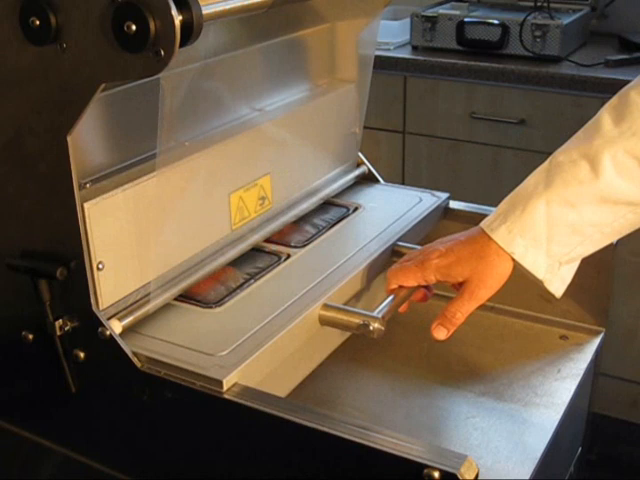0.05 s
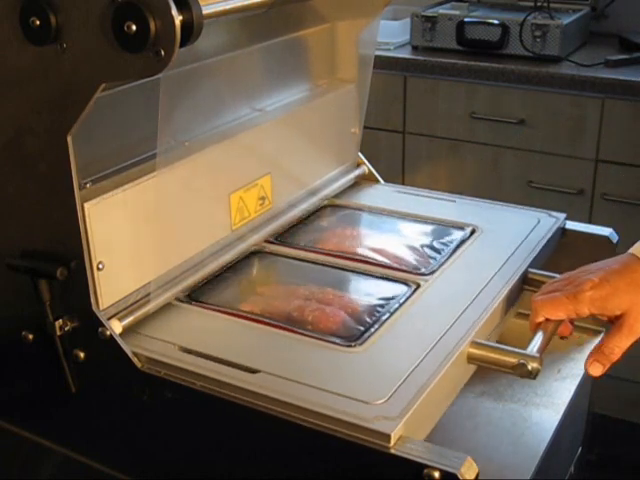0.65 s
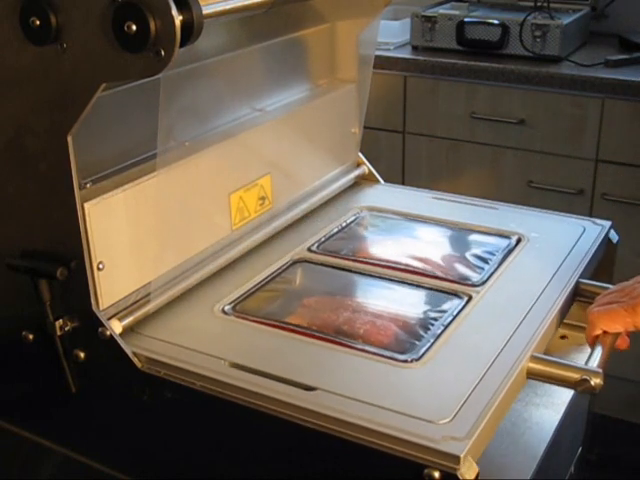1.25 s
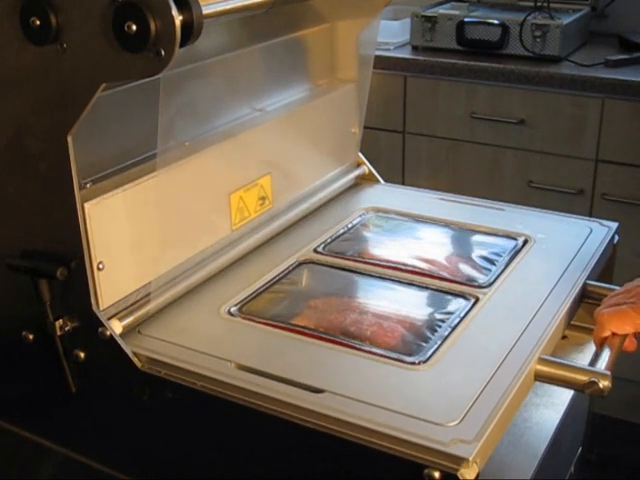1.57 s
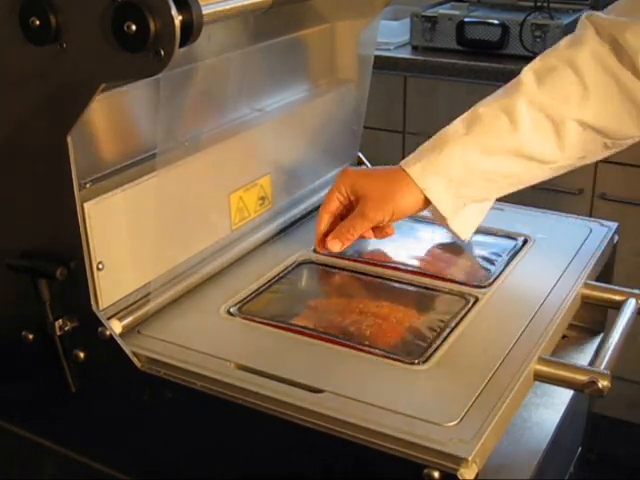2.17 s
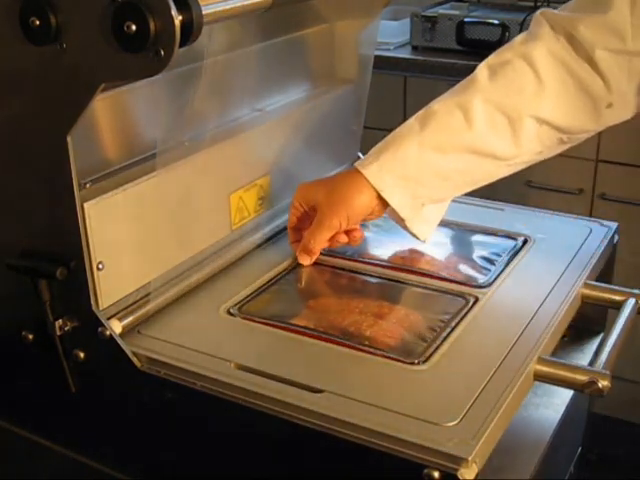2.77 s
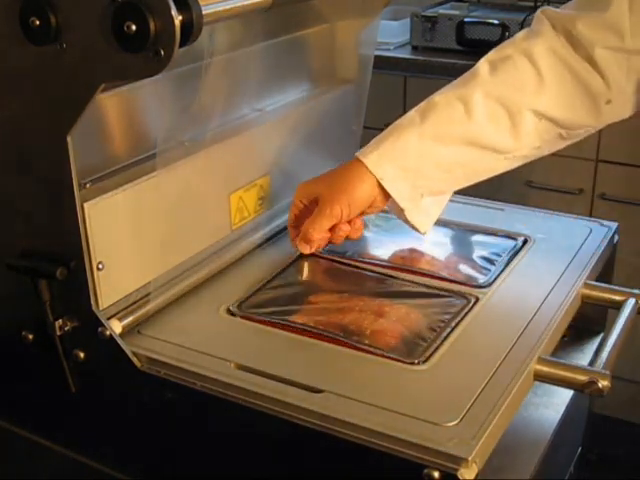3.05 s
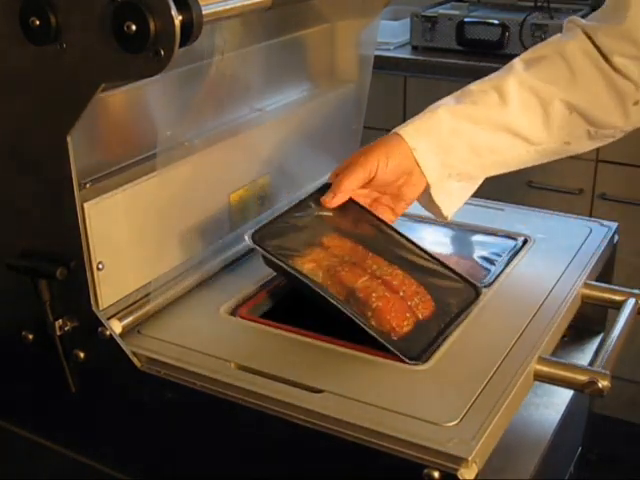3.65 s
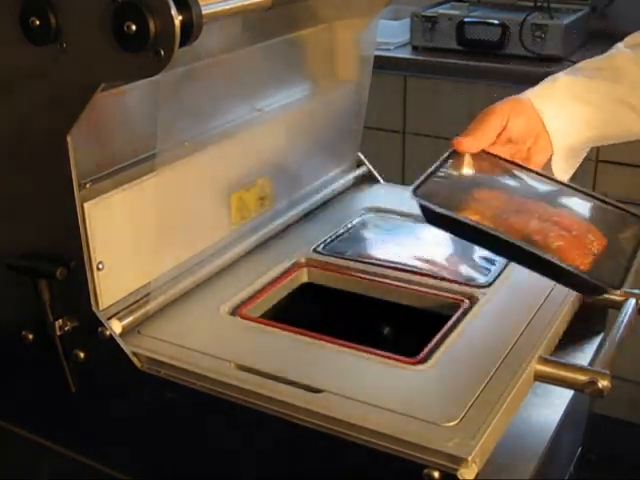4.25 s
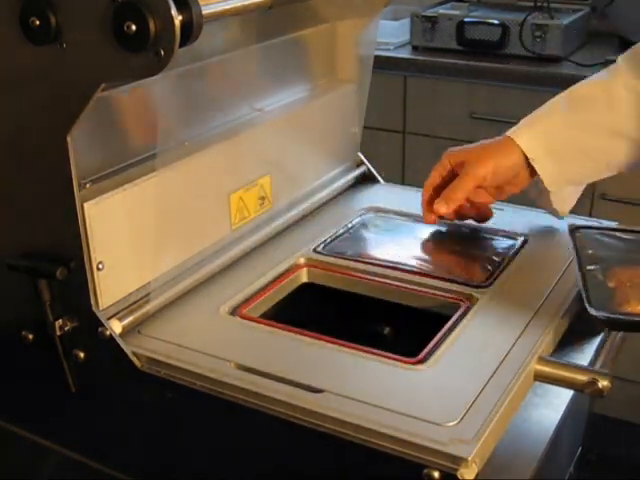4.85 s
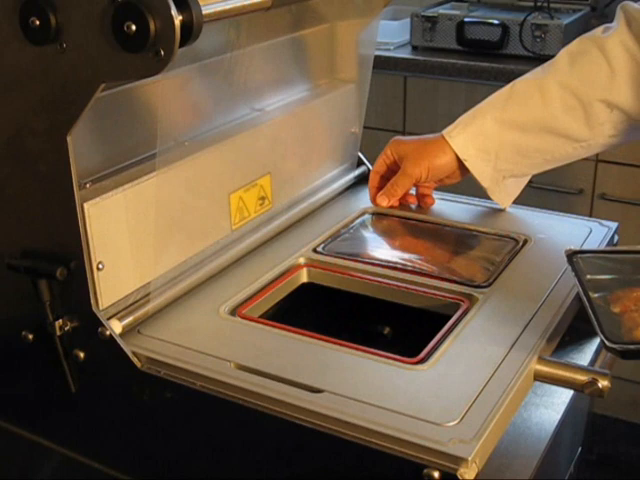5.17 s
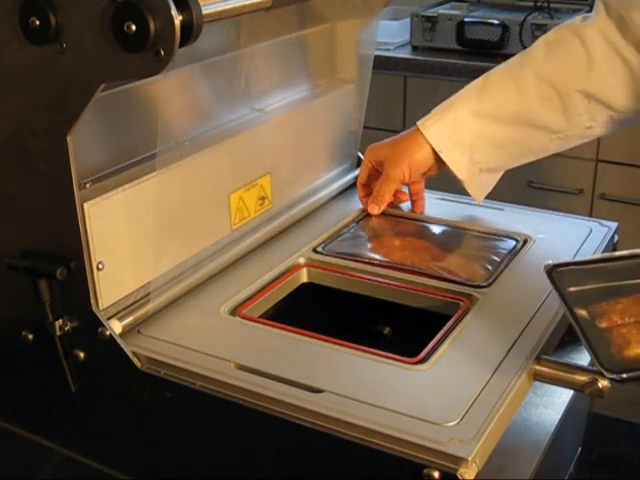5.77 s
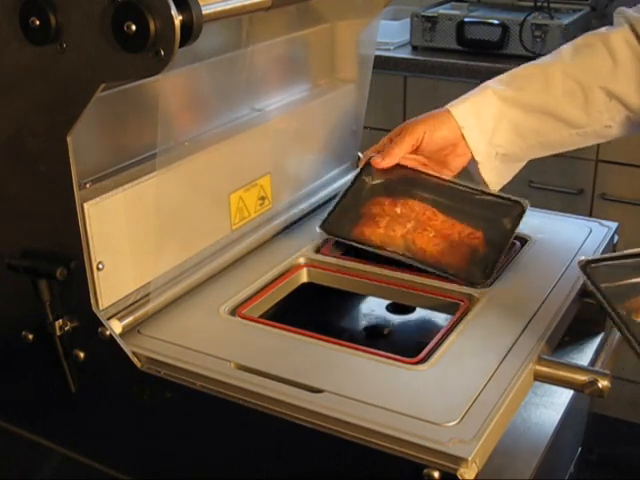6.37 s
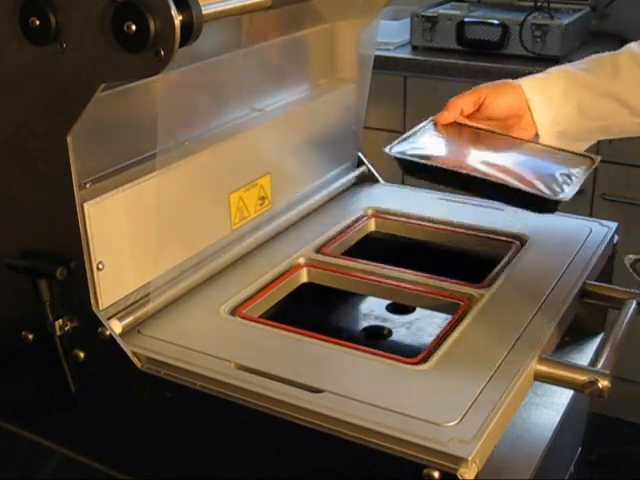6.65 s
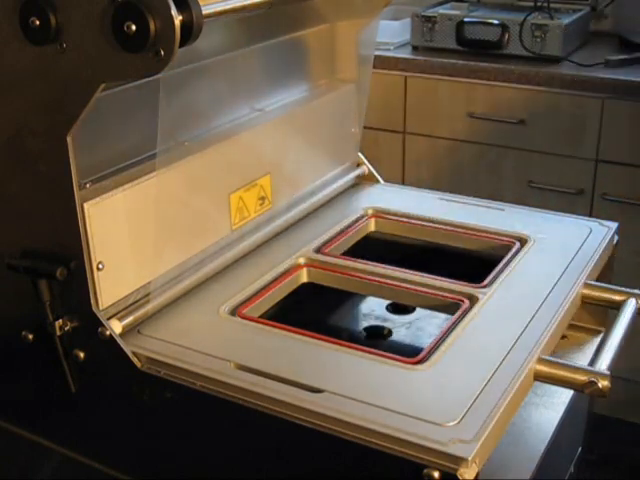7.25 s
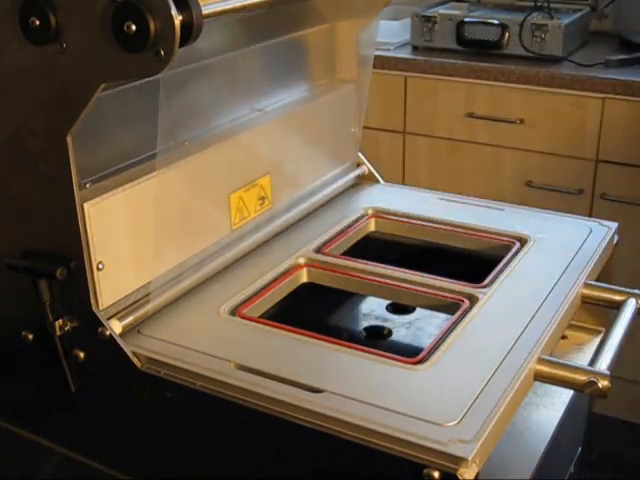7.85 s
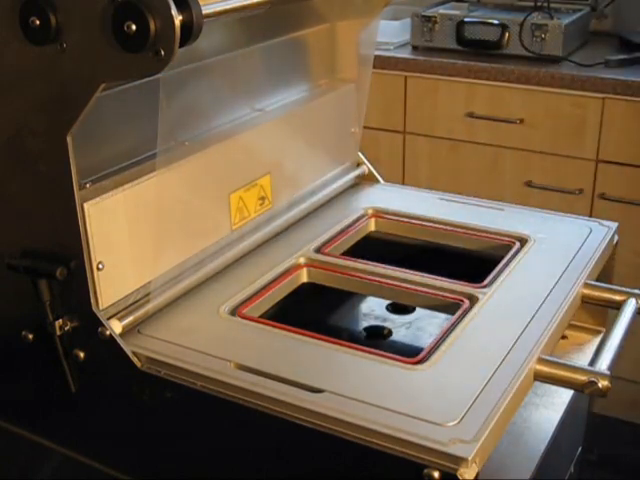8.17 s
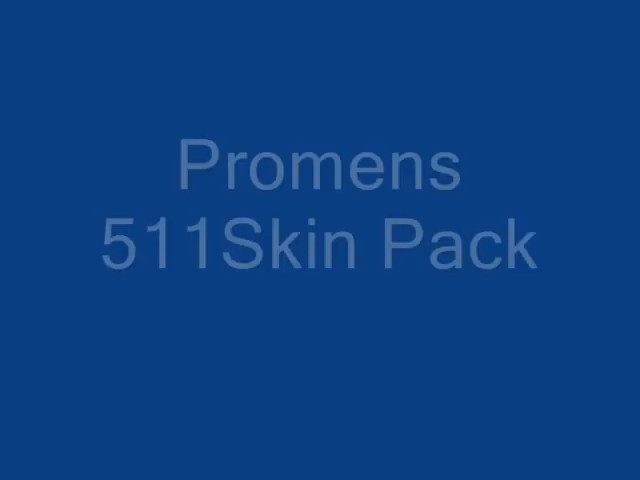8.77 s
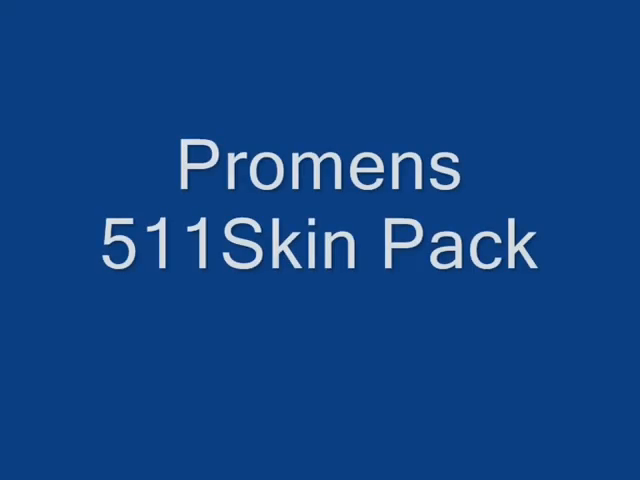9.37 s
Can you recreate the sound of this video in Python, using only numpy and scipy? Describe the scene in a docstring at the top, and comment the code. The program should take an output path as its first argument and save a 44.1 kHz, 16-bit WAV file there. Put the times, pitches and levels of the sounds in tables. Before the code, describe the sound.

From the start, the vacuum pump of a tabletop packaging machine runs steadily, heard close in a small hard-walled workroom. It makes a buzzing, slightly wavering hum over a rush of exhaust air that resonates in the steel housing. Very fast, light ticking runs through it, with a faint fan tone and thin motor whines beneath. A soft, grainy high hiss sputters up and settles at uneven intervals throughout.

At about 1.5 seconds a steel drawer hits its end stop: one loud metallic clunk with a quick rattling rebound and a short ring in the room. The machine noise ducks briefly and is back by about 2 seconds. The pump keeps the same pace, its tones swelling and sinking a little around 7 to 8.5 seconds. At about 8.6 seconds the sound cuts off abruptly, leaving silence.

```python
"""The vacuum pump of a tabletop skin-pack machine runs steadily in a small hard-walled workroom.
Three vanes a turn interrupt the flow, giving a buzzing harmonic hum, ticks, and puffs of exhaust that
excite the steel housing's resonances. A fan tone, motor whines and flares of sputtering hiss lie beneath.
A drawer is pulled out and knocks on its end stop; an automatic gain control ducks and recovers.
At the end the sound cuts off."""
import sys
import numpy as np
from scipy import signal
from scipy.fft import rfft, irfft, next_fast_len
from scipy.io import wavfile
from scipy.ndimage import uniform_filter1d, minimum_filter1d

SR = 44100
rng = np.random.default_rng(int(sys.argv[2]) if len(sys.argv) > 2 else 0)


def to_wav(s):
    """Save 16-bit WAV."""
    ch = np.atleast_2d(s).T  # columns
    pcm = np.round(np.clip(ch, -1, 1) * 32767)  # PCM
    wavfile.write(sys.argv[1], SR, pcm.astype(np.int16))


N = 419813
TIME = np.arange(N) / SR
SHAFT_HZ = 24.118


def from_db(db):
    """The decibel scale: 20 dB is a factor of ten in amplitude."""
    return 10 ** (np.asarray(db) / 20)


def unit_rms(x):
    """Normalisation to unit mean power."""
    return x / np.sqrt(np.mean(x ** 2) + 1e-20)


def curve(rows):
    """Linear interpolation of (time_s, value) rows at every sample."""
    return np.interp(TIME, *np.transpose(rows))


def drift(corner_hz):
    """Slow random fluctuation: low-passed noise of unit rms."""
    step, warm_up = 100, 1000
    pole = np.exp(-2 * np.pi * corner_hz * step / SR)
    noise = rng.standard_normal(N // step + warm_up + 2)
    slow = signal.lfilter([1], [1, -2 * pole, pole * pole], noise)[warm_up:]
    return np.interp(np.arange(N) / step, np.arange(len(slow)), unit_rms(slow))


def coloured(x, spectrum, resonances=()):
    """Source-filter model: a broad spectral envelope with resonant peaks shapes x, at unit rms."""
    size = next_fast_len(N)
    freqs = np.maximum(np.arange(size // 2 + 1) * SR / size, 1)
    hz, db = np.transpose(spectrum)
    envelope = from_db(np.interp(np.log(freqs), np.log(hz), db))
    peaks = sum(from_db(peak_db) ** 2 / (1 + (2 * (freqs - centre_hz) / width_hz) ** 2) ** 2
                for centre_hz, width_hz, peak_db in resonances)
    return unit_rms(irfft(rfft(x, size) * envelope * np.sqrt(1 + peaks), size)[:N])


def ring(clicks, hz, t60_s):
    """Damped oscillator: a unit impulse starts a decaying sine of unit amplitude."""
    pole, angle = from_db(-60 / (t60_s * SR)), 2 * np.pi * hz / SR
    return signal.lfilter([0, np.sin(angle)], [1, -2 * pole * np.cos(angle), pole * pole], clicks + 1e-18)


def fading(clicks, t60_s):
    """Exponential decay: an envelope that jumps at each impulse and dies away."""
    return signal.lfilter([1], [1, -from_db(-60 / (t60_s * SR))], clicks + 1e-18)


def low_pass(x, hz):
    """First-order roll-off of the treble."""
    return signal.sosfilt(signal.butter(1, hz, fs=SR, output="sos"), x + 1e-18)


def reflections(x, t60_s, wet_db, above_hz):
    """Diffuse reverberation: dense reflections add a decaying, high-passed tail."""
    t = TIME[:SR // 2]
    tail = rng.standard_normal(len(t)) * from_db(-60 * t / t60_s)
    high_pass = signal.butter(2, above_hz, "high", fs=SR, output="sos")
    tail = signal.sosfilt(high_pass, tail / np.linalg.norm(tail))
    return x + from_db(wet_db) * signal.fftconvolve(x, tail)[:N]


def shaft_turns(wander=.0007, flutter=.0009):
    """Phase is the integral of speed: the turns made by a nearly steady motor."""
    return np.cumsum(SHAFT_HZ * (1 + wander * drift(.7) + flutter * drift(12))) / SR


# blade tone of a second rotor, probably the cooling fan: time_s, pitch_hz
FAN_PITCH = [(0, 294.6), (2, 294.8), (3.6, 293), (5.2, 292.7), (7.2, 294.4), (8.6, 293.9)]

def fan(level_db):
    """Beating: a blade tone a few hertz above the shaft's twelfth harmonic throbs against it."""
    cycles = np.cumsum(curve(FAN_PITCH)) / SR + rng.random()
    return np.sqrt(2) * from_db(level_db) * np.sin(2 * np.pi * cycles)


# thin tones of the motor: pitch_hz, level_db
WHINES = [(825.6, -38.5), (1718.0, -40), (2531, -50), (2892, -56.5), (4173, -49.5)]

def motor_whines(turns, waver_db):
    """Inharmonic partials: tones that follow the motor's speed but lie between the pump's harmonics."""
    out = 0
    for hz, db in WHINES:
        cycles = hz * turns / SHAFT_HZ + rng.random()
        out += from_db(db + waver_db * drift(8)) * np.sin(2 * np.pi * cycles)
    return np.sqrt(2) * out


# strong flares of sputtering at the exhaust: start_s, level_db
FLARES = [(0.24, -39), (0.576, -37), (1.24, -40), (1.362, -38), (2.096, -46), (2.608, -40), (3.057, -41.5),
          (3.769, -37.5), (4.387, -40), (5.0, -43), (5.497, -41), (5.837, -41.4), (6.452, -39),
          (6.703, -41), (7.331, -41), (7.917, -41.5)]

def flare_starts(weak_per_s=4.5, weak_db=-45.5, spread_db=3):
    """A point process: weak impulses at loosely even intervals among the timed strong ones."""
    count = np.cumsum(weak_per_s * np.exp(.5 * drift(4))) / SR
    size_db = weak_db + spread_db * np.clip(rng.standard_normal(N), -2, 2)
    starts = np.diff(np.floor(count), prepend=0) * from_db(size_db)
    for start_s, db in FLARES:
        starts[round(start_s * SR)] = from_db(db)
    return starts


# spectrum of the hiss: frequency_hz, relative_db
SPUTTER_SPECTRUM = [(1200, -33.5), (3000, -0.5), (5000, 5), (9200, 0.5), (10000, -4.5), (12000, -6.5),
                    (15500, -27)]
# resonances of the exhaust outlet: centre_hz, width_hz, peak_db
OUTLET_MODES = [(7000, 120, 0.5), (7780, 180, 3.5), (11460, 150, 4)]

def sputter(turns):
    """Amplitude-modulated noise: a grainy hiss throbs with the shaft, flares up and settles."""
    flares = low_pass(fading(flare_starts(), t60_s=.36), hz=45)
    steady = from_db(-45.5 + 2 * drift(8.1))
    grains = rng.standard_normal(N) * from_db(2.2 * np.clip(rng.standard_normal(N), -3, 3))
    spray = grains * from_db(1.8 * np.cos(2 * np.pi * turns))
    spray = reflections(spray, t60_s=.13, wet_db=0, above_hz=5800)
    return np.hypot(flares, steady) * coloured(spray, SPUTTER_SPECTRUM, OUTLET_MODES)


# spectrum of the vane ticks: frequency_hz, relative_db
TICK_SPECTRUM = [(300, -29), (900, -3), (1500, -9.5), (2000, 3), (3000, 4), (4200, -5), (4500, -3.5),
                 (9000, -17.5), (15500, -35.5)]
# resonance of the pump casting: centre_hz, width_hz, peak_db
CASTING_MODES = [(4280, 160, 2.5)]

def vane_ticks(turns, spread_db=2, throb_db=2):
    """Impact and dispersion: vanes slap the chamber wall unevenly and the casting smears each click."""
    ticks = np.diff(np.floor(3 * turns), prepend=0)
    ticks *= from_db(spread_db * rng.standard_normal(N) + throb_db * np.cos(2 * np.pi * turns))
    t = TIME[:SR // 20]
    path = rfft(rng.standard_normal(len(t)) * np.exp(-t / .012))
    all_pass = irfft(path / np.abs(path))
    return coloured(signal.fftconvolve(ticks, all_pass)[:N], TICK_SPECTRUM, CASTING_MODES)


# the drawer meets its stop and rebounds: start_s, relative_db, brightness_hz
KNOCKS = [(1.505, -13, 7000), (1.5076, 2, 7020), (1.5115, -3.5, 7000), (1.5135, -1, 1200), (1.53, -8, 2000),
          (1.551, -2, 1500)]
# modes of the steel tray: pitch_hz, relative_db, t60_s
TRAY_MODES = [(86, -24, .3), (165, -11, 0.28), (410, -21.5, .1), (486, -9.5, 0.068), (660, -6.5, .08),
              (905, -7, .07), (1070, -11, .1), (1308, -17, 0.077), (1680, -11.5, 0.052), (1934, -18, 0.05),
              (2430, -7, 0.07), (2683, -8, 0.039), (3770, -18, .03)]
# spectrum of the rails' clatter: frequency_hz, relative_db
RAIL_SPECTRUM = [(50, -20.5), (150, 6), (600, 8.5), (1400, 1.5), (2700, -2.5), (4000, -7.5), (8000, -18),
                 (15000, -37.5)]

def drawer():
    """Impact excitation: blows on the end stop ring the tray's modes and rattle the rails in the room."""
    pushes, clatter = np.zeros(N), np.zeros(N)
    rattle = coloured(rng.standard_normal(N), RAIL_SPECTRUM)
    for start_s, db, bright_hz in KNOCKS:
        start = round(start_s * SR)
        span = slice(start, start + SR // 4)
        click = from_db(db) * signal.unit_impulse(SR // 4)
        # a softer contact dulls both the ring and the clatter
        pushes[span] += low_pass(click, bright_hz)
        clatter[span] += low_pass(fading(click, t60_s=.029) * rattle[span], 2 * bright_hz)
    tray = sum((-1) ** k * from_db(db) * ring(pushes, hz, t60_s)
               for k, (hz, db, t60_s) in enumerate(TRAY_MODES))
    knock = from_db(-7.5) * tray + from_db(-6.5) * clatter
    return reflections(knock, t60_s=.45, wet_db=-2, above_hz=57)


# spectrum of the exhaust rush: frequency_hz, relative_db
EXHAUST_SPECTRUM = [(25, -11), (60, -9.5), (130, -2), (350, 1.5), (850, 1.5), (1400, -2.5), (2000, -5),
                    (2900, -7.5), (4150, -8.5), (4450, -17), (9200, -28), (9900, -32.5), (12500, -37.5),
                    (15500, -42)]
# resonances of the steel housing: centre_hz, width_hz, peak_db
HOUSING_MODES = [(27, 2.2, 13), (275.4, 14, 8.5), (426.5, 38, 5.5), (460, 8.2, 7), (477.3, 10.9, 9),
                 (556.5, 18, 8), (579, 27, 6.5), (684, 13, 6.5), (756, 6.7, 10), (844, 23, -4.5),
                 (875, 4.8, 13), (1042, 13, 6.5), (1169, 20, 7.5), (1204, 54, 8.5), (1244, 22, 11),
                 (1327, 17.0, 9), (1404.5, 20, 12), (1588, 35, 5.5), (2969, 32, 3.5), (4247, 99, 4),
                 (11600, 132.4, 6.5)]

def exhaust(turns, puff_db=3):
    """Forced resonance: flow noise swells as each of three vanes passes the port, ringing the housing."""
    vane_phase = (3 * turns) % 1
    puffs = rng.standard_normal(N) * from_db(puff_db * np.exp(-vane_phase / .055))
    puffs = reflections(puffs, t60_s=.15, wet_db=-7, above_hz=2000)
    return coloured(puffs, EXHAUST_SPECTRUM, HOUSING_MODES)


# steady tones of the pump: shaft_multiple, level_db
PUMP_HARMONICS = [(3, -57.5), (6, -28.5), (8, -37.5), (9, -43), (11, -44), (12, -31), (15, -49), (18, -39),
                  (19, -45.5), (20, -52), (21, -36.5), (22, -48), (24, -35), (25, -51.5), (27, -48.5),
                  (28, -40), (29, -46.5), (30, -30.5), (31, -46), (32, -40.5), (33, -31.5), (36, -39),
                  (38, -49.5), (39, -50), (40, -48.5), (44, -46), (48, -41), (52, -40), (54, -50),
                  (57, -41.5), (59, -45.5), (60, -48.5)]
# single tones swell or sink for a while: shaft_multiple, centre_s, half_width_s, change_db
SWELLS = [(12, 4.1, 1.5, 2), (12, 7.3, 0.57, -9), (15, 8.1, .5, 10.5), (24, 7.6, 0.2, -7),
          (24, 8.42, 0.14, 10.5), (30, .8, 0.5, -1.5), (30, 6.74, .4, 2.5), (33, 8.5, .35, 5.5)]

def pump_hum(turns, shared_waver_db, waver_db, flutter_db, sway_cycles):
    """A harmonic series locked to the shaft; the higher partials waver most in level and phase."""
    shared_gain = from_db(shared_waver_db * drift(2.9))
    slow, fast = [drift(1.9) for _ in range(5)], [drift(21.7) for _ in range(7)]
    out = 0
    for k, (order, db) in enumerate(PUMP_HARMONICS):
        swell_db = sum(change_db * np.exp(-((TIME - centre_s) / half_width_s) ** 2)
                       for multiple, centre_s, half_width_s, change_db in SWELLS if multiple == order)
        unrest = min(order / 20, 1) ** 2   # short waves are disturbed most
        shift = k * SR // 3   # each partial wavers at its own moments
        waver, flutter = np.roll(slow[k % 5], shift), np.roll(fast[k % 7], shift)
        level_db = db + swell_db + unrest * (waver_db * waver + flutter_db * flutter)
        cycles = order * turns + rng.random() + sway_cycles * unrest * fast[k % 7]
        out += from_db(level_db) * np.sin(2 * np.pi * cycles)
    return np.sqrt(2) * shared_gain * out


# the pump's effort, which lifts the exhaust and the vane ticks together: time_s, change_db
EFFORT = [(0, 0.4), (1.4, 0.95), (2.4, 0.4), (4.5, -0.3), (7.7, 0.5), (8.6, 1.1)]

def scene():
    """Superposition: the pump's sounds, timed by one shaft, add to the fan and the drawer's knock."""
    turns = shaft_turns()
    effort_db = curve(EFFORT)
    pump = pump_hum(turns, shared_waver_db=.57, waver_db=1.2, flutter_db=1.95, sway_cycles=.044)
    pump += motor_whines(turns, waver_db=2.5) + fan(level_db=-39.5)
    pump += from_db(-25.5 + effort_db) * exhaust(turns)
    pump += from_db(-39.5 + effort_db) * vane_ticks(turns)
    return (pump + sputter(turns) + drawer())[None]


def gain_control(x, hold_s, release_s, attack_hz, threshold_db=-13, max_cut_db=7.5):
    """Automatic gain control: power above a threshold pulls the gain down; it holds, then eases back."""
    level_db = 10 * np.log10(np.abs(uniform_filter1d(x * x, size=200)) + 1e-9)
    cut_db = np.clip(1.5 * (level_db - threshold_db), 1e-6, max_cut_db)
    window = int(hold_s * SR) // 2 * 2 + 1
    held_db = -minimum_filter1d(-cut_db, window, origin=window // 2)
    decay = TIME / release_s
    released_db = np.exp(np.maximum.accumulate(np.log(held_db) + decay) - decay)
    return x * from_db(-low_pass(released_db, attack_hz))


def record(dry, off_s=8.626, cutoff_hz=15650):
    """Compression and band limiting: gain control, rounded peaks, a quick fade at each end, a low-pass."""
    x = gain_control(dry[0], hold_s=.12, release_s=.26, attack_hz=11)
    x = 1.2 * np.tanh(x / 1.2)
    x *= np.minimum(TIME / .004, 1)
    after_s = np.maximum(TIME - off_s, 0)
    x *= from_db(-4000 * after_s) + from_db(-59 - 300 * after_s)   # abrupt cut with a faint tail
    treble_limit = signal.ellip(12, .1, 90, cutoff_hz, fs=SR, output="sos")
    return signal.sosfilt(treble_limit, x)[None]


dry = scene()
out = record(dry)
to_wav(out)
```